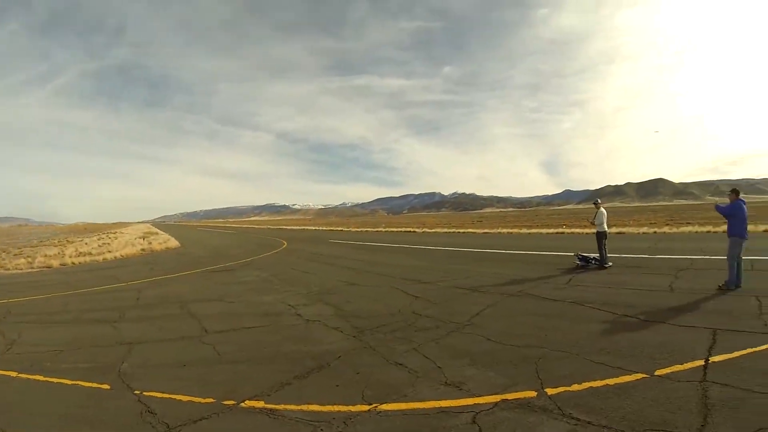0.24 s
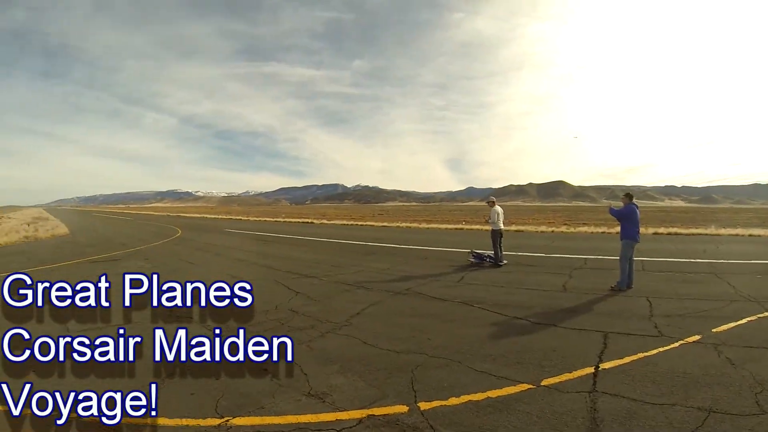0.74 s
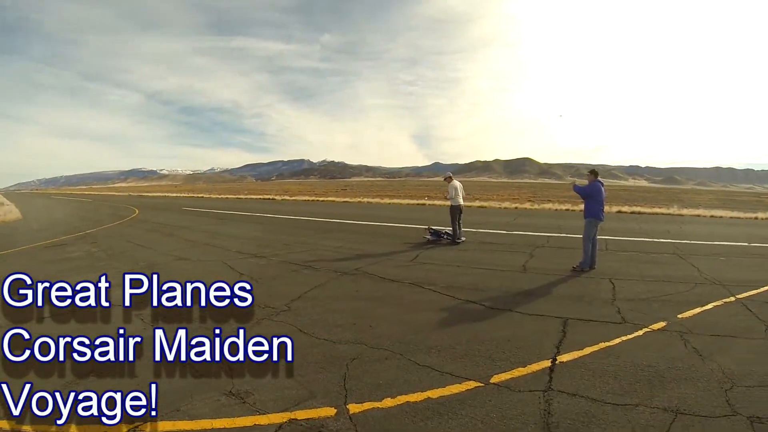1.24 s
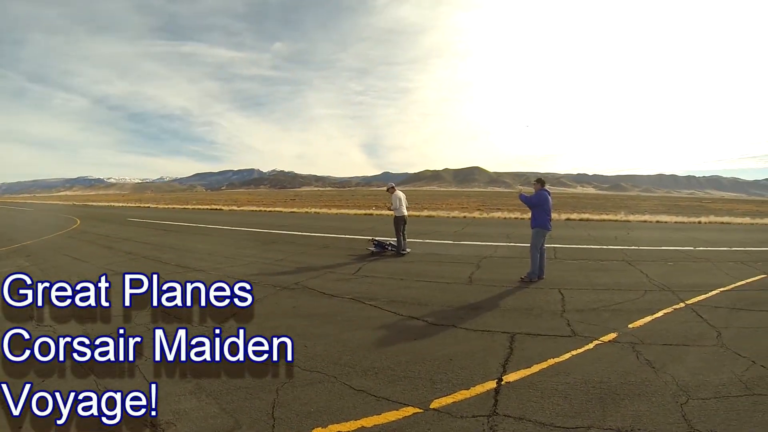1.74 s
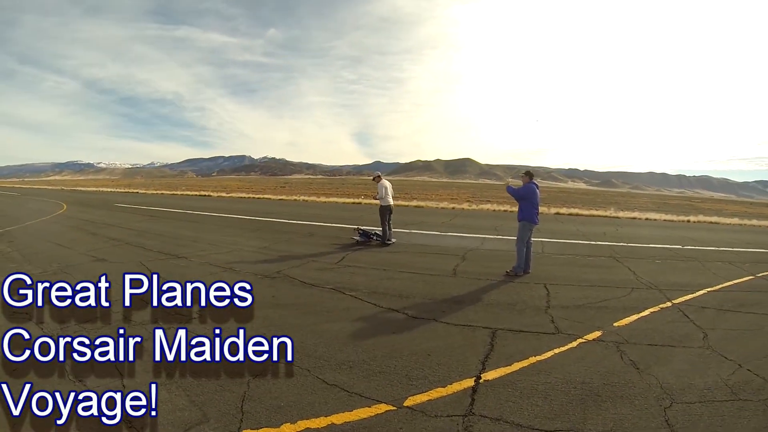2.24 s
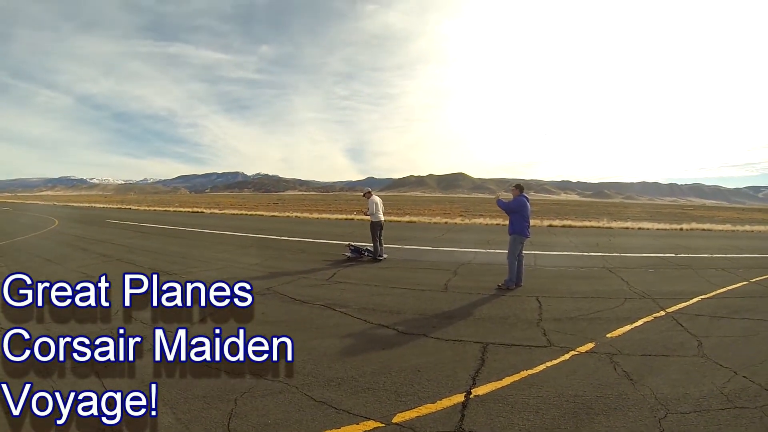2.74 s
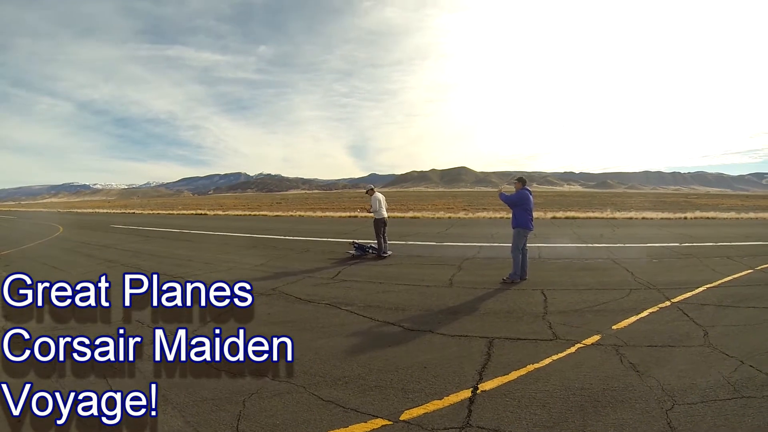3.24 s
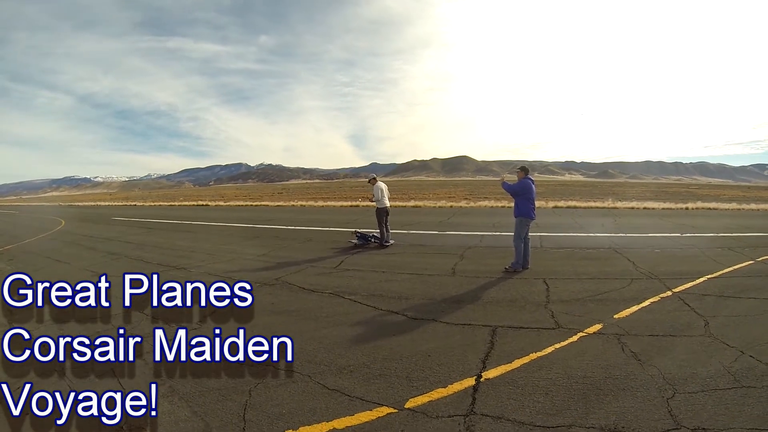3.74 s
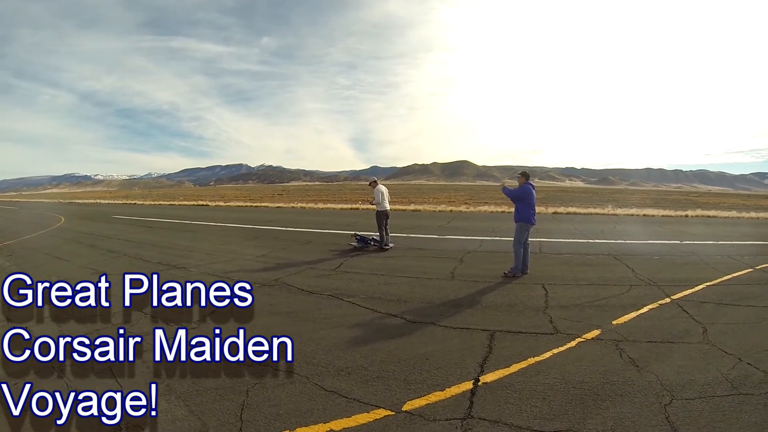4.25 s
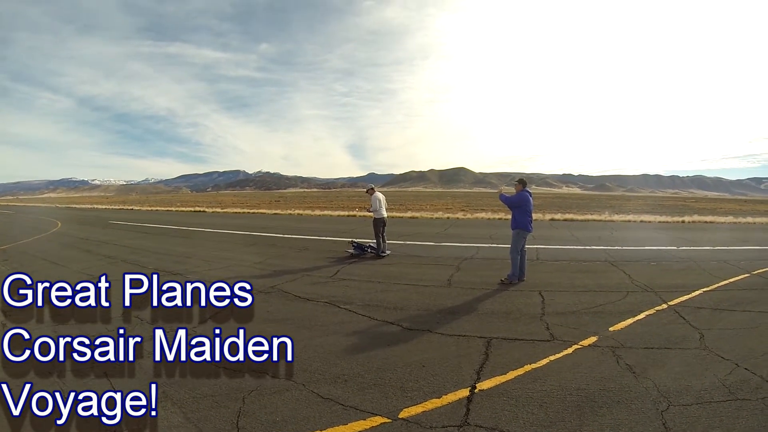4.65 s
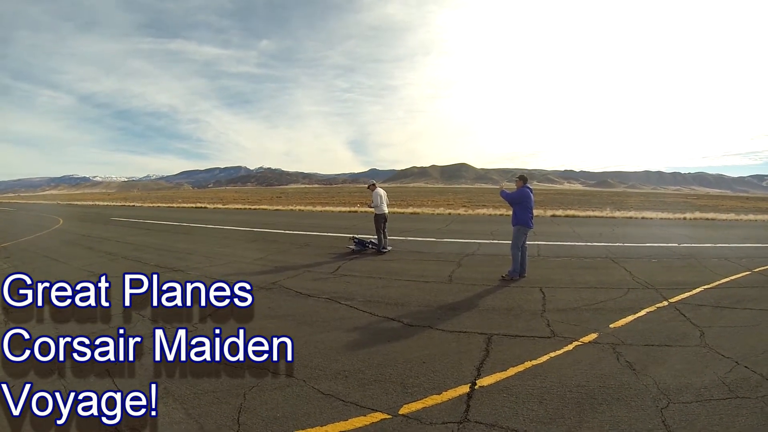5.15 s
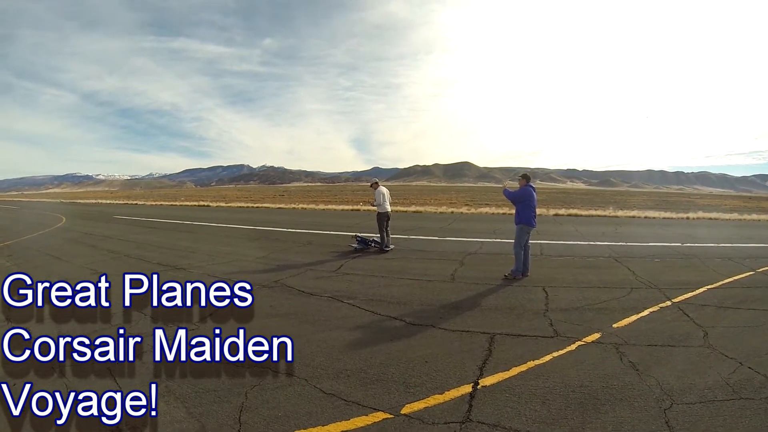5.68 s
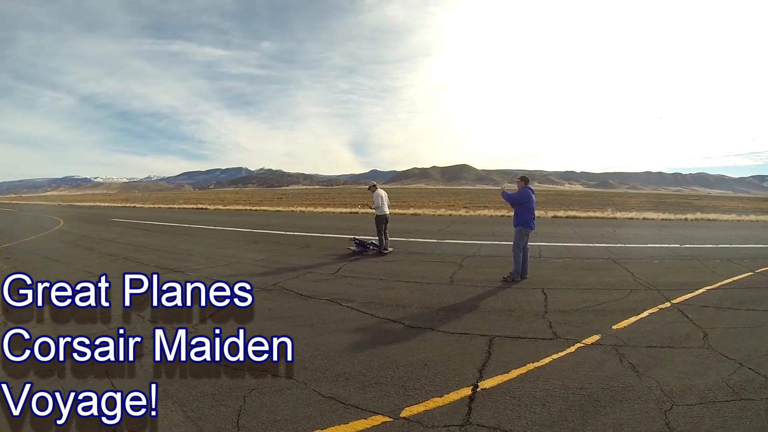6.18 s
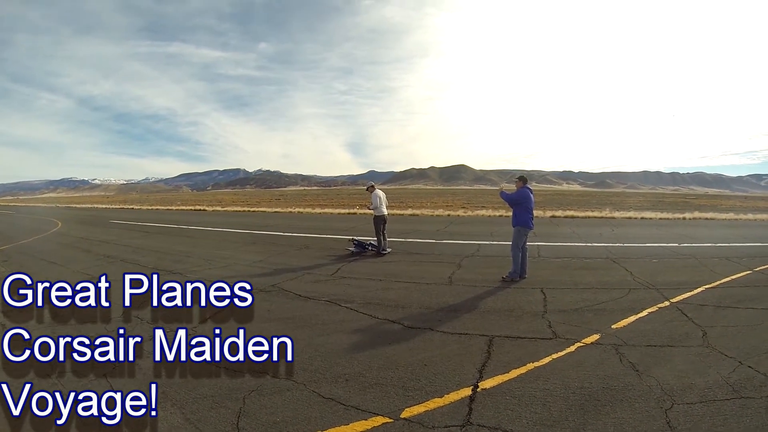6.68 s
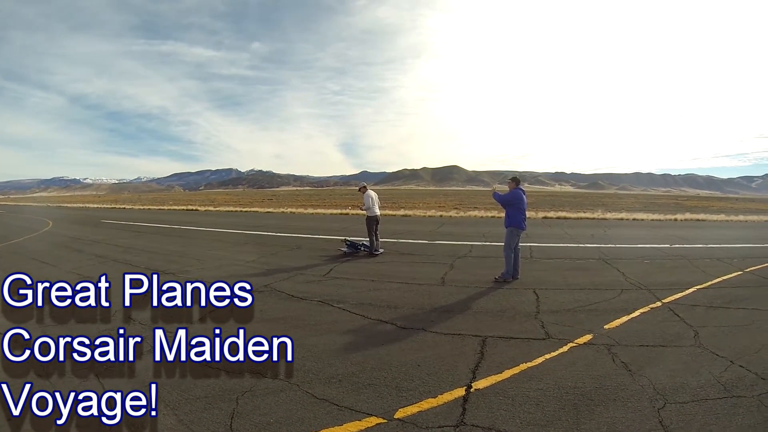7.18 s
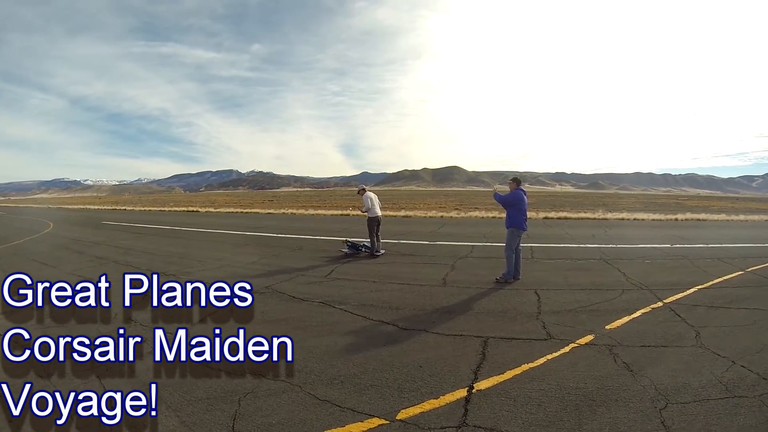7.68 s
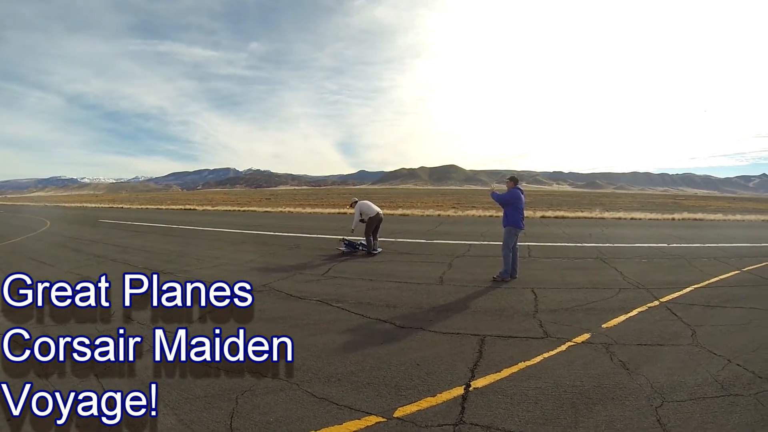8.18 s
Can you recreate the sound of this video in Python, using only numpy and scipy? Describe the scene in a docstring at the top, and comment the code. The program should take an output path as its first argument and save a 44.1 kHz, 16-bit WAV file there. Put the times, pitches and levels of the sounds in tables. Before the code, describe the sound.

A small model airplane engine pops, revs up unevenly to a loud, high buzz, then sinks to a sputtering idle in light wind.

```python
"""A model airplane's single-cylinder two-stroke engine a few metres away on an open airstrip, in light wind.
It pops, hoots as the throttle opens and revs up, stumbling as every other stroke weakens; one tick sounds.
Exhaust pulses ring muffler and airframe, rising to a full-throttle buzz with a brief hiss on the way.
At 6.2 s the throttle shuts and it sinks to a sputtering idle, the three-blade propeller humming between
single pops."""
import sys
import numpy as np
from scipy import signal
from scipy.fft import rfft, irfft, next_fast_len
from scipy.io import wavfile
from scipy.ndimage import uniform_filter1d, map_coordinates

SR = 44100
rng = np.random.default_rng(int(sys.argv[2]) if len(sys.argv) > 2 else 0)


def waveform_to_disk(signal):
    """Save audio, clipped to [-1, 1], as 16-bit WAV at the path in sys.argv[1]."""
    frames = np.transpose(np.atleast_2d(signal))
    scaled = np.clip(frames, -1, 1) * 32767
    samples = np.round(scaled).astype(np.int16)
    wavfile.write(sys.argv[1], SR, samples)


N = 371322
TIME = np.arange(N) / SR
START_S, IDLE_S = .413, 6.4


def amp(db):
    """dB to gain."""
    return 10 ** (np.asarray(db) / 20)


def unit(x):
    """Scale to rms 1."""
    return x / np.sqrt(np.mean(x ** 2) + 1e-20)


def steady(x, size=4410):
    """Hold the running rms at 1."""
    power = uniform_filter1d(uniform_filter1d(x ** 2, size), size)
    return x / np.sqrt(np.abs(power) + 1e-9)


def along(points, hz):
    """Read (f/Hz, value) rows on a log axis."""
    f_hz, values = np.transpose(points)
    return np.interp(np.log(hz + 1), np.log(f_hz), values)


def curve(points):
    """Read (t/s, value) rows at every sample."""
    return np.interp(TIME, *np.transpose(points))


def wobble(rate_hz):
    """Smooth random curve with knots at rate_hz."""
    knots = rng.standard_normal(int(N * rate_hz / SR) + 4)
    return map_coordinates(knots, [np.arange(N) * rate_hz / SR])


def colour(x, points, size=4096):
    """Minimum-phase filter of energy 1 from (f/Hz, level/dB) rows; -60 dB/octave above the last."""
    hz = np.fft.rfftfreq(size, 1 / SR)
    db = along(points, hz) - 60 * np.log2(np.maximum(hz / points[-1][0], 1))
    cepstrum = irfft(np.log(amp(db) + 1e-6))
    cepstrum[1:size // 2] *= 2
    cepstrum[size // 2 + 1:] = 0
    response = irfft(np.exp(rfft(cepstrum)))
    return signal.fftconvolve(x, response / np.linalg.norm(response))[:N]


def pulses(times_s, sizes, half_taps=8):
    """Band-limited impulses between samples."""
    at = times_s[:, None] * SR
    taps = np.floor(at).astype(int) + np.arange(1 - half_taps, half_taps + 1)
    shape = np.sinc(taps - at) * np.cos(np.pi * (taps - at) / (2 * half_taps)) ** 2
    return np.bincount(np.clip(taps, 0, N - 1).ravel(), (sizes[:, None] * shape).ravel(), N)


def bounce(x, delay_s, back):
    """All-pass: cavity echoes spread a pulse in time and keep its colour."""
    size = next_fast_len(N + SR // 2)
    late = np.exp(-2j * np.pi * np.fft.rfftfreq(size, 1 / SR) * delay_s)
    return irfft(rfft(x, size) * (back + late) / (1 + back * late), size)[:N]


def delayed(x, lag_s):
    """Delay by a changing lag."""
    return map_coordinates(x, [np.arange(N) - lag_s * SR], order=2)


def grow(speed_hz, full_db, knee_hz, db_per_hz):
    """Level/dB: rises with speed up to a knee, then holds."""
    return full_db - db_per_hz * np.maximum(knee_hz - speed_hz, 0)


def coasting(cut_s=6.23, shut_s=.19, settle_s=.27):
    """0 under power, 1 once the throttle has shut, 0 again at idle."""
    age_s = TIME - cut_s
    return np.clip(age_s / shut_s, 0, 1) * np.clip(1 - (age_s - shut_s) / settle_s, 0, 1)


def wind(gust_db=2.5, boost_db=2, air_db=-74):
    """Low buffeting on the microphone over a faint even hiss."""
    # wind strength: t/s, level/dB
    strength = [(0.45, -60), (1.25, -40.5), (3.44, -45), (3.59, -40), (4.66, -46.5), (7.05, -40.5),
                (7.29, -46), (7.84, -34), (8.4, -44)]
    # buffeting spectrum: f/Hz, level/dB
    spectrum = [(10, -4), (25, -6), (65, -7), (110, -15.5), (250, -25), (700, -79)]
    rumble = unit(colour(rng.standard_normal(N), spectrum) * amp(gust_db * wobble(14)))
    return amp(curve(strength) + boost_db) * rumble + amp(air_db) * rng.standard_normal(N)


def firings(turns, every_turns=3, soft_db=-2.5, scatter_db=1.5):
    """Single firings as (t/s, level/dB); at idle, softer ones fall between the hard ones."""
    # hard firings at low speed: t/s, relative level/dB
    hard = [(0.4137, -43), (0.4615, -43), (0.517, -36.5), (0.598, -33), (6.8129, -28), (6.9234, -30),
            (6.997, -26), (7.0566, -26), (7.213, -28.5), (7.3588, -27), (7.5178, -25.5), (7.5625, -26.5),
            (7.5904, -27), (7.6177, -25.5), (7.6857, -25), (7.725, -27.5), (7.7815, -27), (7.8241, -25.5),
            (7.9124, -29.5), (7.9722, -29), (8.1323, -28), (8.2403, -26), (8.2976, -29.5), (8.4102, -30)]
    rows = list(hard)
    for (s, db), (next_s, _) in zip(hard, hard[1:]):
        if s > IDLE_S:
            first, last = np.interp([s, next_s], TIME, turns)
            soft_turns = np.arange(first + every_turns, last - every_turns / 2, every_turns)
            for soft_s in np.interp(soft_turns, turns, TIME):
                rows.append((soft_s, db + soft_db + scatter_db * rng.standard_normal()))
    return sorted(rows)


def pops(fired, boost_db=22, tail_gain=.04, t60_s=.028):
    """Each single firing is a bang with a short tail of gas."""
    # muffler and airframe response: f/Hz, level/dB
    body = [(40, -21), (110, 7.5), (300, 8), (500, -1.5), (800, 9.5), (1150, -10.5), (1650, 5.5),
            (2000, -6), (2350, -13), (2720, -27), (2980, -1.5), (3250, -58), (3550, -13), (4050, -42),
            (4500, -16), (5000, -51), (6000, -33), (8100, -58), (9200, -47), (15000, -44)]
    age_s = np.arange(SR // 10) / SR
    bangs = np.zeros(N + SR)
    for s, db in fired:
        burst = tail_gain * rng.standard_normal(len(age_s)) * amp(-60 * age_s / t60_s)
        burst[0] -= 1
        bangs[round(s * SR):][:len(age_s)] += amp(db + boost_db) * burst
    return colour(bounce(bangs[:N], delay_s=.00099, back=.8), body)


def propeller(turns, speed_hz, rough, blades=3, shimmer_db=1.27):
    """Blade-passing tone."""
    # blade tone: f/Hz, level/dB
    levels = [(180, -39), (203, -31.5), (225, -37), (265, -39.5), (340, -43), (385, -30), (430, -42),
              (500, -52)]
    db = along(levels, blades * speed_hz) + shimmer_db * rough * wobble(45)
    return np.sqrt(2) * amp(db) * np.cos(2 * np.pi * blades * turns)


def churn(level_db=-39.5, lumps_db=2):
    """Lumpy low noise of air stirred by the blades, masked at high speed."""
    # churned air: f/Hz, level/dB
    spectrum = [(70, -22), (125, -5.5), (190, -9.5), (290, -1), (370, -1.5), (460, -7.5), (600, -11),
                (900, -32)]
    return amp(level_db) * unit(colour(rng.standard_normal(N), spectrum) * amp(lumps_db * wobble(40)))


def pipe_tones(turns, speed_hz, rough, misfire_hz=86, misfire_db_per_hz=1.2, coast_db=-11, lag_rad=.2845):
    """Exhaust pressure wave: the pipe cancels or lifts each order near a tuned speed and lags its phase."""
    # orders 1-12: full level/dB, knee/Hz, growth/(dB/Hz), tuned speed/Hz, width/Hz, change in tune/dB
    orders = [(-26.5, 157, 0.15, 171, 3.3, -8.5), (-13, 163.4, .32, 164, 5.1, -3.5),
              (-20.5, 167.3, .5, 167, 2, -4), (-20, 155, 0.62, 171.5, 1.5, -23.5),
              (-39, 135, 0.5, 161.5, 2.77, -13.5), (-37, 137.8, 0.78, 165, 2.5, -12),
              (-35, 146, 0.7, 161, 4.4, -26), (-39.5, 165, .4, 172, 1.6, 11.5),
              (-37, 143, 5, 166.5, 6.1, -9), (-31, 162, 1.5, 168.5, 1.2, 8.5),
              (-20, 177.5, 0.75, 164, 1.765, -13), (-29.5, 154, 2, 171, 0.99, -22)]
    # muffler resonance: f/Hz, gain/dB
    bark = [(300, -8), (560, -18.5), (690, 15.5), (825, 23.5), (900, 6), (1020, 9), (1250, 5.5)]
    misfire_db = misfire_db_per_hz * np.maximum(misfire_hz - speed_hz, 0)
    wave = np.zeros(N)
    for k, (full_db, knee_hz, db_per_hz, tuned_hz, width_hz, tuned_db) in enumerate(orders, 1):
        db = grow(speed_hz, full_db, knee_hz, db_per_hz) - misfire_db
        db += tuned_db / (1 + ((speed_hz - tuned_hz) / width_hz) ** 2)
        if k == 1:  # the fundamental needs load
            db += coast_db * coasting()
        if k in (5, 6, 7):
            db += along(bark, k * speed_hz)
        shimmer_db = 1.27 * wobble(45) if k < 5 else 5.5 * wobble(70)
        wave += amp(db + rough * shimmer_db) * np.cos(2 * np.pi * k * turns - lag_rad * k * k)
    return np.sqrt(2) * wave


def strokes(turns, skip, rough, scatter_db=3.5, jitter_s=14e-6, slip_chance=.04):
    """Time and strength of each port opening; the strong-weak pattern sometimes slips a turn."""
    count = np.arange(1, int(turns[-1]) + 1)
    times_s = np.interp(count, turns, TIME)
    scatter, jitter = np.interp(times_s, TIME, rough) * rng.standard_normal((len(count), 2)).T
    weak = (count + np.cumsum(rng.random(len(count)) < slip_chance)) % 2
    sizes = amp(scatter_db * scatter) * (1 - weak * np.interp(times_s, TIME, skip))
    return times_s + jitter_s * jitter, sizes


def gas(times_s, sizes, life_s, floor=1):
    """Turbulence flares at each stroke and decays to a floor."""
    last = np.clip(np.searchsorted(times_s, TIME) - 1, 0, None)
    envelope = floor + sizes[last] * np.exp(-np.abs(TIME - times_s[last]) / life_s)
    return steady(envelope * rng.standard_normal(N))


def exhaust(turns, speed_hz, skip, rough, intake_gain=.4, echo_gain=.38, ground_gain=.38, chuff_gain=.37):
    """Once a turn the port opens: a crack and a dying puff of gas ring the muffler and airframe."""
    # muffler and airframe responses, low to high: f/Hz, level/dB
    puff_body = [(60, -16.5), (130, -13), (200, -5), (300, -10), (480, -8.5), (620, 2), (720, 2.5),
                 (820, 6.5), (930, 2.5), (1100, -8), (1500, -29)]
    rasp_body = [(750, -57), (1050, -5.5), (1200, -5), (1380, 2), (1560, 0), (1720, 4.5), (1890, 2),
                 (2060, -2), (2200, -13), (2500, -71)]
    buzz_body = [(1900, -31), (2250, -2), (2550, 3), (2740, -2.5), (2920, 4.5), (3100, -3.5), (3280, 3),
                 (3550, -2.5), (3800, -11), (3980, -7), (4250, -17.5), (4750, -11.5), (5300, -15.5),
                 (5800, -41)]
    shriek_body = [(2900, -22.5), (3280, 8), (3700, -5.5), (4400, -8), (4900, 5.5), (5400, -13),
                   (6000, -26), (9000, -23.5), (10100, -8), (11200, -24.5), (14000, -33)]
    sizzle_body = [(4900, -33), (5700, -9), (6400, -14), (7400, -12), (7750, -2), (8150, 0.5), (8600, -9.5),
                   (9300, -18.5), (10100, -18.5), (11000, -23), (13000, -29), (15500, -37.5)]
    # asphalt reflection as the microphone moves: t/s, lag/s
    ground_lag = [(.4, 0.00043), (1, 0.00045), (1.6, 0.00055), (2, 0.00059), (3, 0.00062), (8.4, 0.00053)]
    # treble swell: t/s, gain/dB
    swell = [(.8, 0.5), (1.1, -3), (1.7, 3), (2.3, 0.5), (2.65, -1), (3.45, 2.5), (4.2, -1), (4.4, 3.5),
             (4.8, 0), (5.3, 1), (6.2, -1)]

    times_s, sizes = strokes(turns, skip, rough)
    crack = steady(pulses(times_s, sizes))
    # the intake gulps about half a turn later; its drift swells the overtones in turn
    gulp_turns = .5 + .009 * np.interp(times_s[:-1], TIME, wobble(3))
    gulp = steady(pulses(times_s[:-1] + gulp_turns * np.diff(times_s), -sizes[:-1]))
    drive = bounce(crack + intake_gain * gulp, delay_s=.000741, back=.57)
    echo_lag_s = .0044 + .00012 * wobble(2.5)
    drive = steady(drive - echo_gain * delayed(drive, echo_lag_s))

    clean, noisy = np.sqrt(1 - rough), np.sqrt(rough)
    rasp = 1.1 * noisy * gas(times_s, sizes, life_s=.0066)
    rasp -= clean * bounce(drive, delay_s=.0028, back=.64)
    buzz = .8 * noisy * gas(times_s, sizes, life_s=.0089)
    buzz += clean * bounce(drive, delay_s=.0017, back=.8)
    spray = bounce(bounce(crack, delay_s=.000843, back=.36), delay_s=.0015, back=.43)
    sizzle = clean * spray + .8 * noisy * gas(times_s, sizes, life_s=.0031, floor=.16)
    sizzle += ground_gain * delayed(sizzle, curve(ground_lag))
    # uneven strokes chuff between the orders
    chuff = steady(pulses(times_s, sizes - uniform_filter1d(sizes, size=4)))
    puff = gas(times_s, sizes, life_s=.007)
    puff += (chuff_gain + skip) * bounce(chuff, delay_s=.0028, back=.69)

    def layer(x, body, full_db, knee_hz, db_per_hz, coast_db):
        """Ring a body at a level set by speed and coasting."""
        db = grow(speed_hz, full_db, knee_hz, db_per_hz) + coast_db * coasting()
        return amp(db) * steady(colour(x, body))

    mids = (layer(puff, puff_body, full_db=-27.5, knee_hz=119, db_per_hz=.23, coast_db=-1.5)
            + layer(rasp, rasp_body, full_db=-23.5, knee_hz=142.5, db_per_hz=.3, coast_db=-4.5)
            + layer(buzz, buzz_body, full_db=-29.5, knee_hz=171, db_per_hz=.26, coast_db=.5))
    treble = (layer(drive, shriek_body, full_db=-40, knee_hz=174, db_per_hz=1.3, coast_db=-1)
              + layer(sizzle, sizzle_body, full_db=-46.5, knee_hz=144.5, db_per_hz=.33, coast_db=-9))
    return mids + amp(curve(swell)) * treble


def hoot(at_s=.515, f_hz=340, level_db=-25, rise_s=.01, t60_s=.18):
    """Hollow hoot as the throttle opens."""
    age_s = np.maximum(TIME - at_s, 0)
    envelope = amp(level_db - 60 * age_s / t60_s) * (1 - np.exp(-age_s / rise_s))
    return envelope * np.sin(2 * np.pi * f_hz * age_s)


def tick(at_s=1.456, level_db=-36, t60_s=.0089):
    """One bright tick of decaying noise."""
    spectrum = [(2000, -34), (6000, -6), (11000, -31), (15000, -31)]  # f/Hz, level/dB
    envelope = (TIME >= at_s) * amp(level_db - 60 * np.abs(TIME - at_s) / t60_s)
    return colour(envelope * rng.standard_normal(N), spectrum)


def hiss(at_s=2.845, level_db=-41, width_s=.06):
    """Brief spit of hiss at high speed."""
    # f/Hz, level/dB
    spectrum = [(2000, -31), (4900, 7), (6200, -11), (8200, -16), (9300, -12), (11000, -9.5), (15000, -22)]
    envelope = amp(level_db) * np.exp(-.5 * ((TIME - at_s) / width_s) ** 2)
    return colour(envelope * rng.standard_normal(N), spectrum)


def idle_port(turns, fired, blend_s=.3):
    """Port phase in turns: at idle its puffs fall into step with the firings."""
    beats_s = np.array([s for s, _ in fired if s > IDLE_S])
    lead_turns = np.unwrap(np.interp(beats_s, TIME, turns) % 1, period=1)
    return turns - np.interp(TIME, beats_s, lead_turns) * np.clip((TIME - IDLE_S) / blend_s, 0, 1)


def scene(hunt=.00291, swing_db=-11, swing_s=.43):
    """One crankshaft drives propeller and exhaust; its speed sets their level and roughness."""
    # crankshaft: t/s, speed/Hz
    crank = [(0.42, 59.4), (0.5, 60), (0.88, 119.6), (1.06, 132), (1.28, 136.1), (1.56, 131), (1.62, 122.4),
             (1.74, 124.1), (1.94, 141.5), (2.1, 134.5), (2.2, 151.1), (2.4, 158.9), (2.64, 162.2),
             (2.8, 157.7), (3.14, 166.8), (3.5, 172), (3.62, 165.3), (3.7, 164.6), (3.78, 167.4),
             (4.26, 173.0), (4.34, 165.9), (4.42, 162.8), (4.62, 166.9), (4.8, 164.8), (5.26, 172.3),
             (5.44, 169.7), (6.2, 173.8), (6.26, 172.1), (6.34, 157.2), (6.44, 124.4), (6.62, 87.25),
             (6.82, 73.7), (7.12, 63.6), (7.46, 60.94), (7.62, 73.46), (8.4, 63.4)]
    # stumble: t/s, weakening of every other stroke/0-1
    stumble = [(1.05, 0.3), (1.35, 0.73), (1.72, 0.86), (1.8, .25), (2, 0.58), (2.2, 0.45), (3.2, 0.29)]
    # slow running burns roughly: speed/Hz, noise share/0-1
    roughness = [(85, 0.99), (112, 0.48), (150, 0.36), (172, 0.25)]
    speed_hz, skip = curve(crank), curve(stumble)
    rough = along(roughness, speed_hz)
    turns = np.cumsum(speed_hz * (1 + hunt * rough * wobble(35))) / SR
    around = hoot() + tick() + hiss() + wind()
    hum = propeller(turns, speed_hz, rough) + pipe_tones(turns, speed_hz, rough)
    fired = firings(turns)
    engine = hum + churn() + exhaust(idle_port(turns, fired), speed_hz, skip, rough)
    # the microphone swings round to the engine
    facing = amp(swing_db * np.exp(-np.maximum(TIME - START_S, 0) / swing_s))
    return (facing * engine + pops(fired) + around)[None]


def record(dry):
    """Silence before START_S; nothing above top_hz."""
    top_hz = 15500
    size = next_fast_len(N + SR // 2)
    passband = np.fft.rfftfreq(size, 1 / SR) < top_hz
    return irfft(rfft(dry * (TIME >= START_S), size) * passband, size)[:, :N]


dry = scene()
out = record(dry)
waveform_to_disk(out)
```